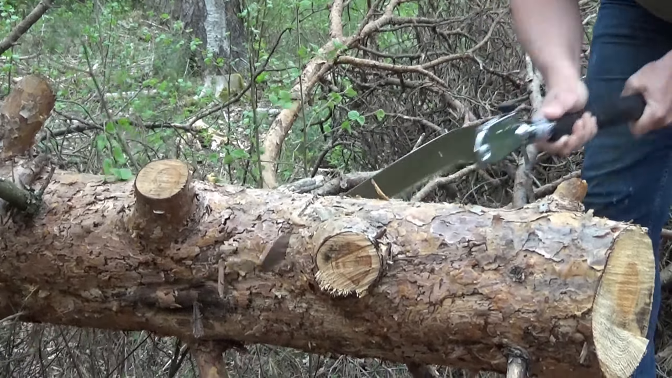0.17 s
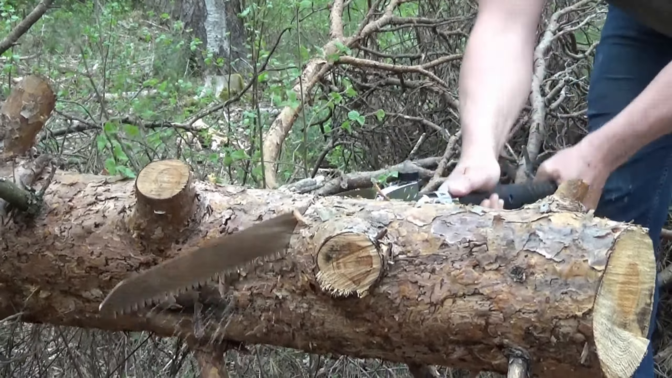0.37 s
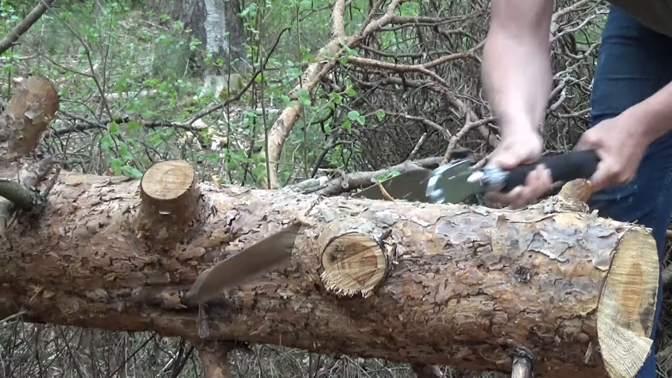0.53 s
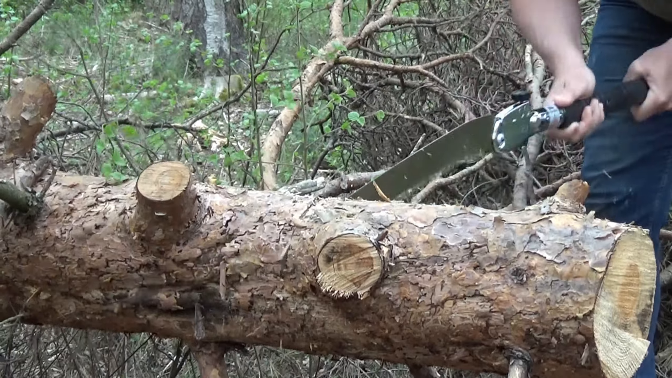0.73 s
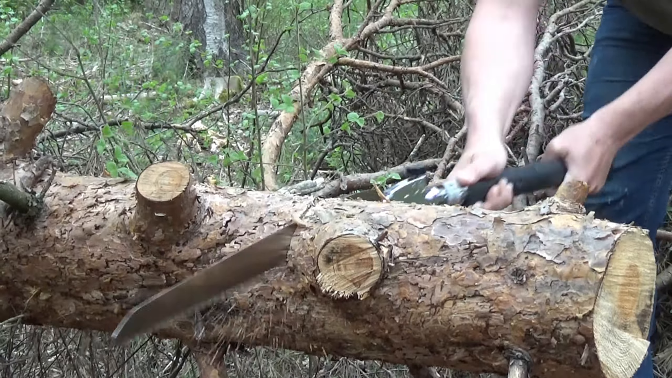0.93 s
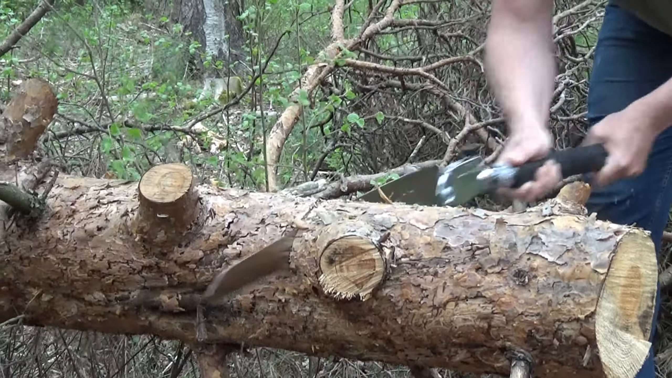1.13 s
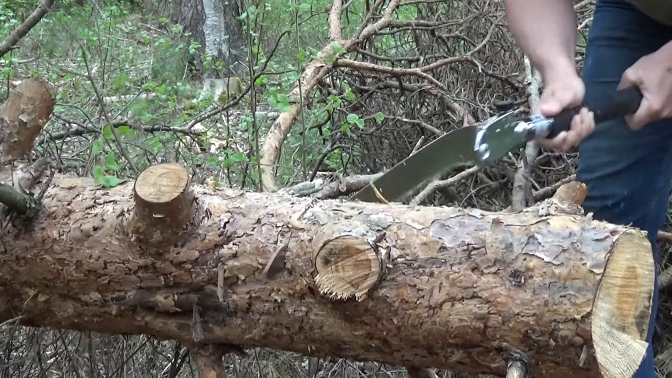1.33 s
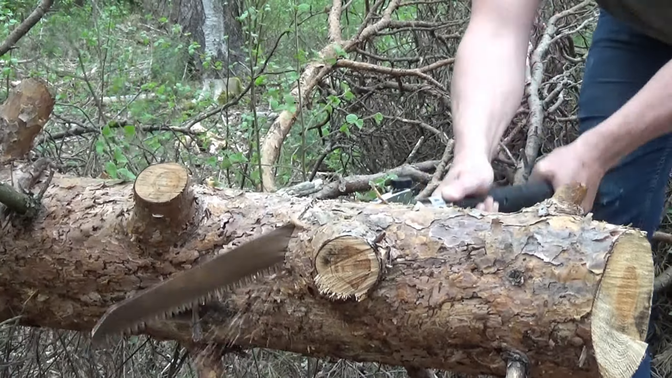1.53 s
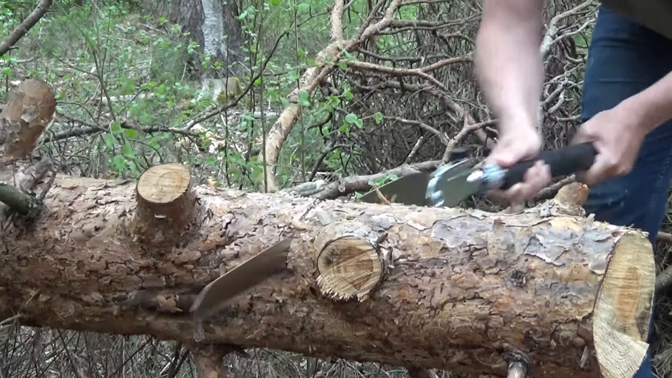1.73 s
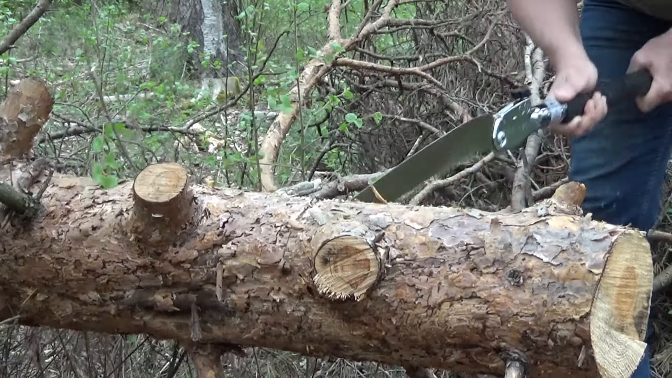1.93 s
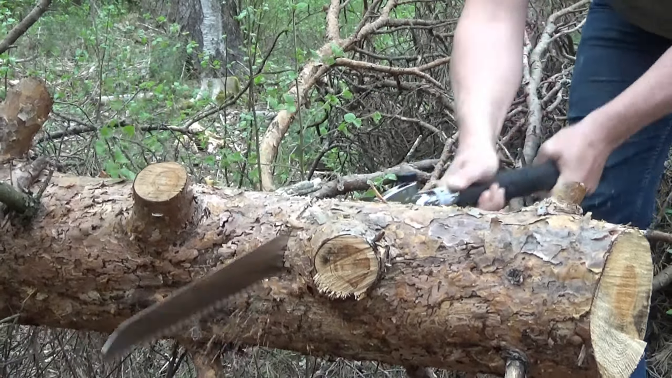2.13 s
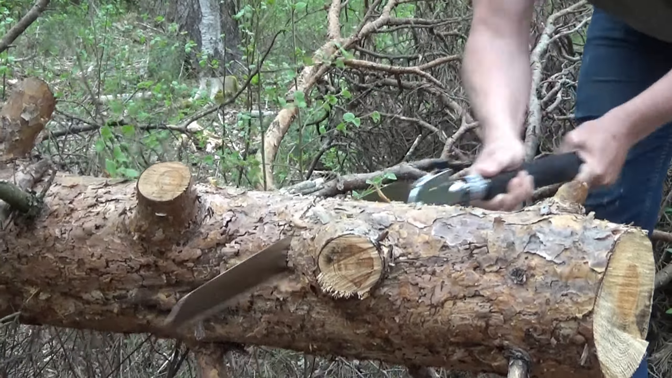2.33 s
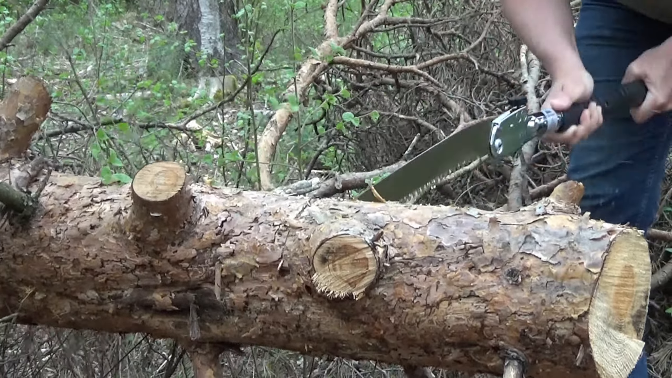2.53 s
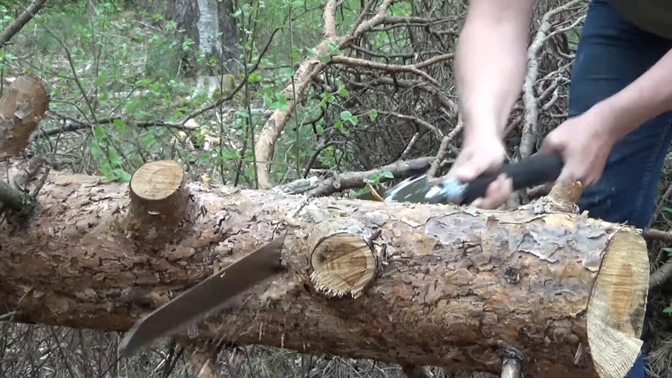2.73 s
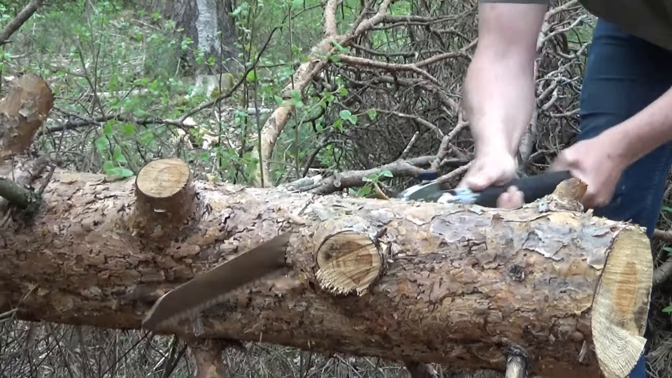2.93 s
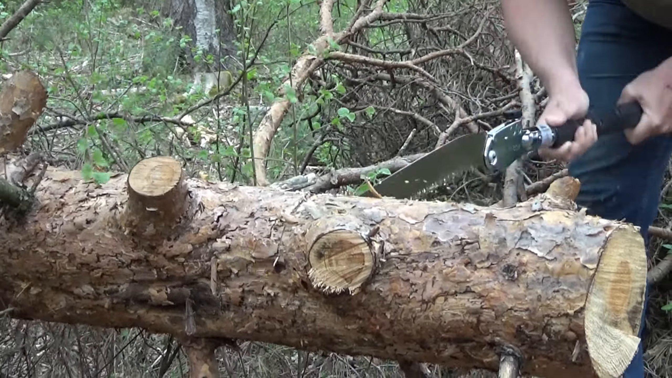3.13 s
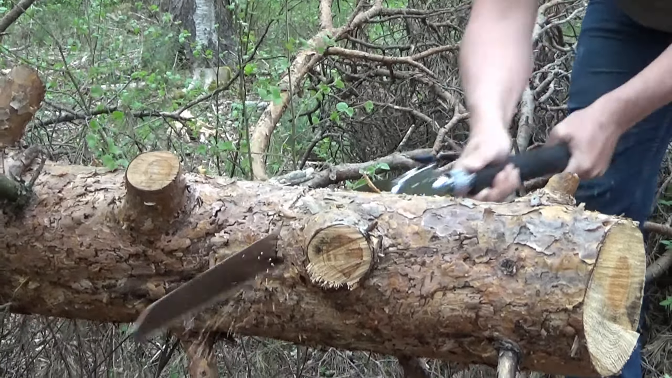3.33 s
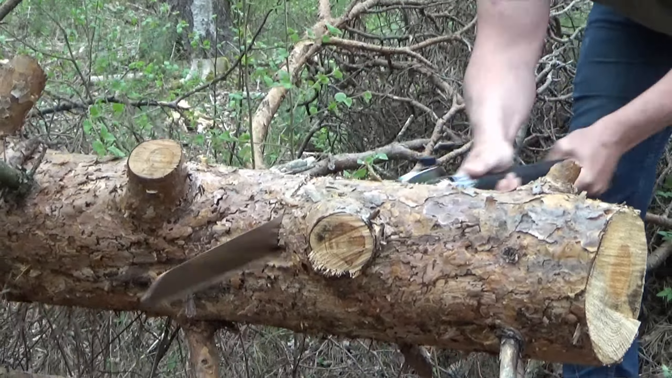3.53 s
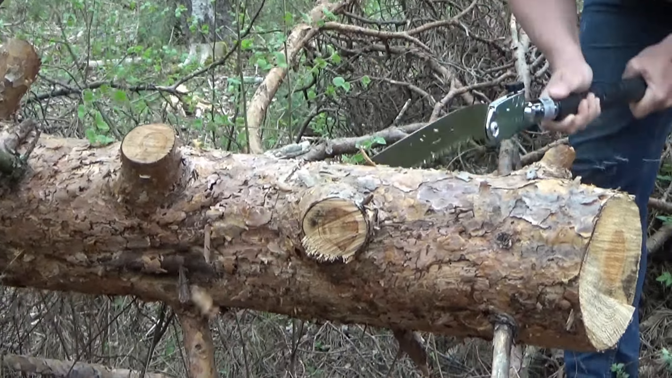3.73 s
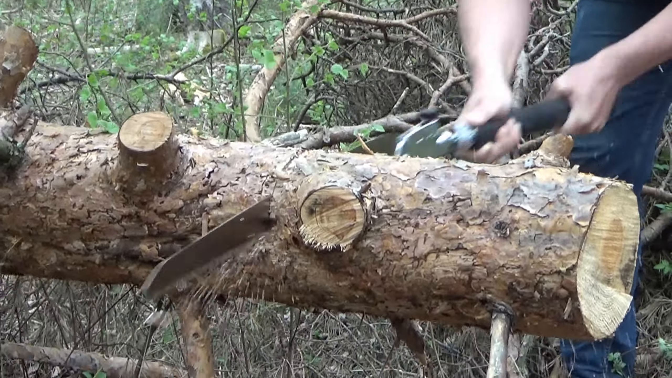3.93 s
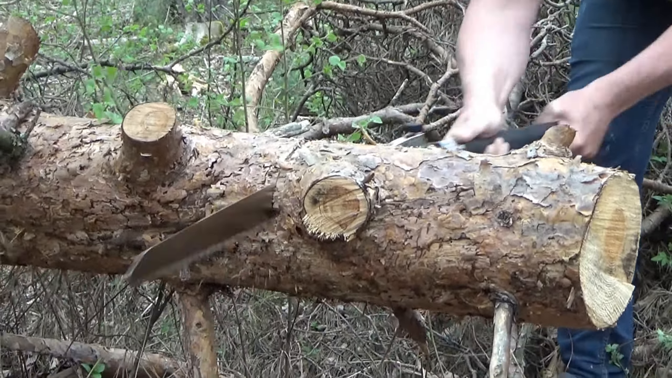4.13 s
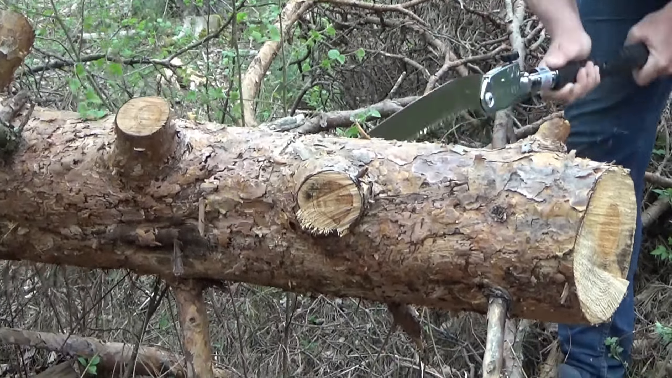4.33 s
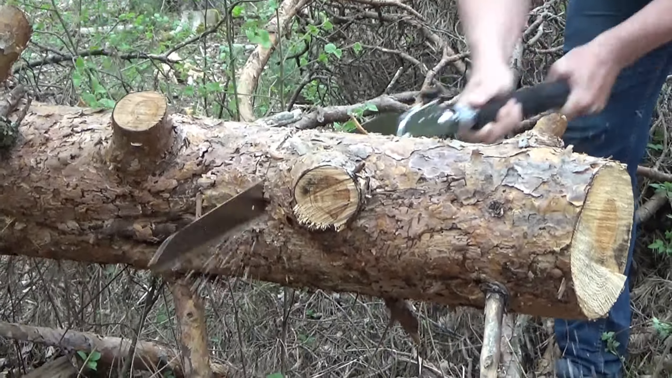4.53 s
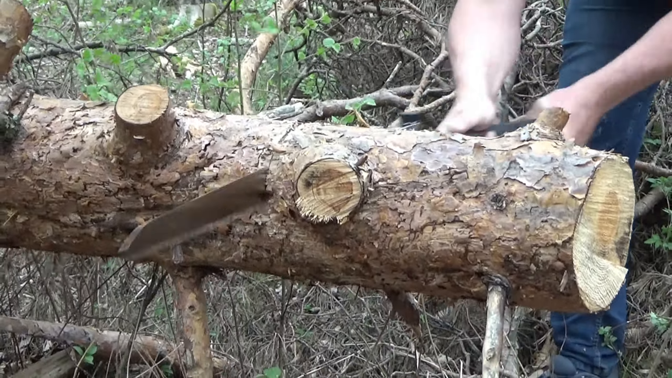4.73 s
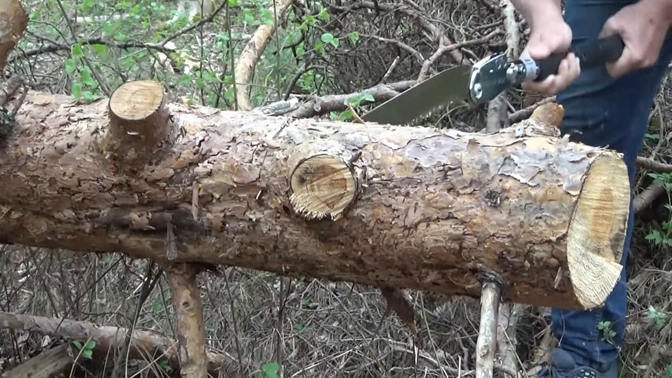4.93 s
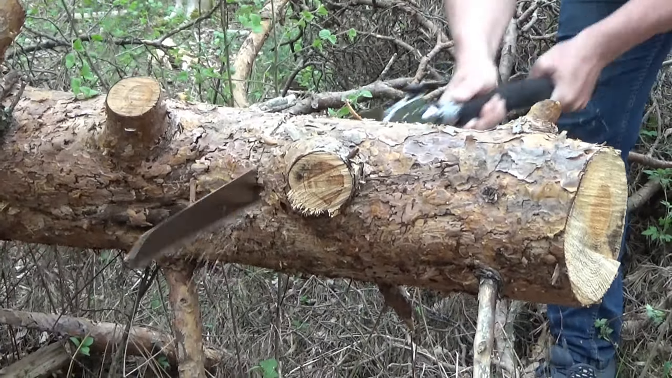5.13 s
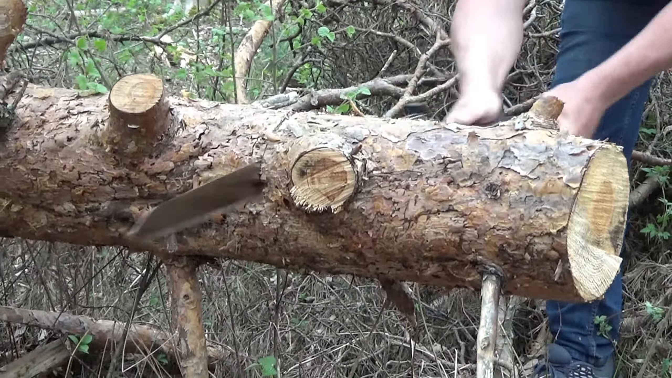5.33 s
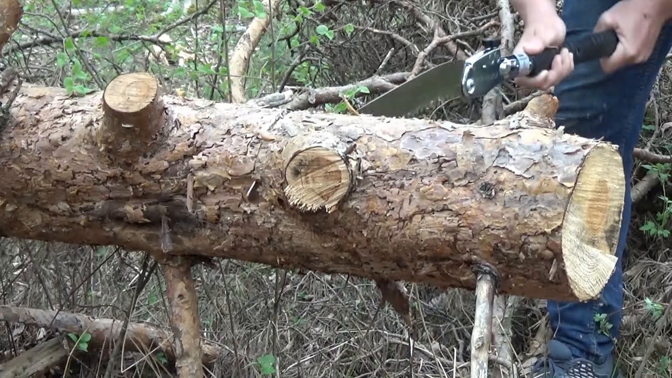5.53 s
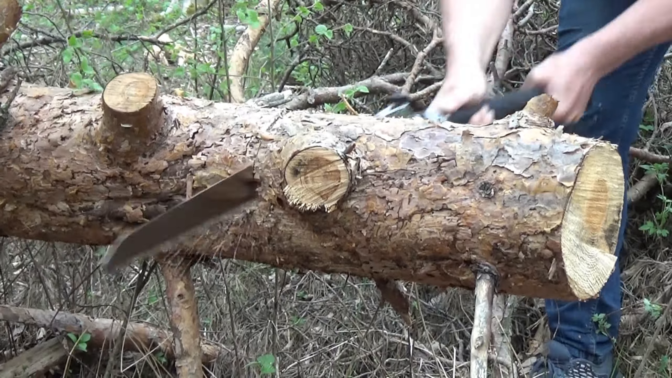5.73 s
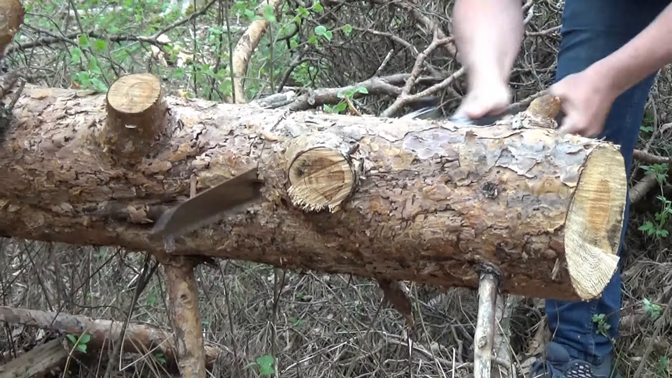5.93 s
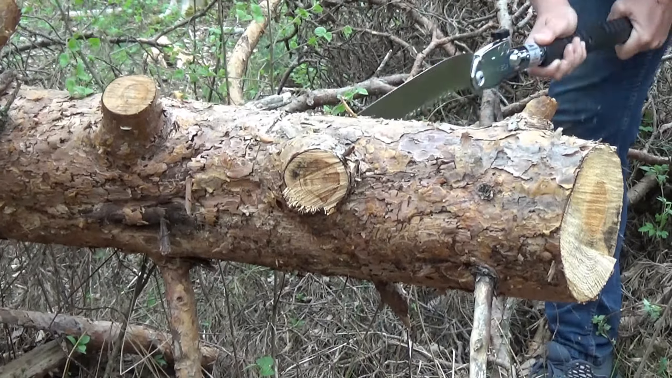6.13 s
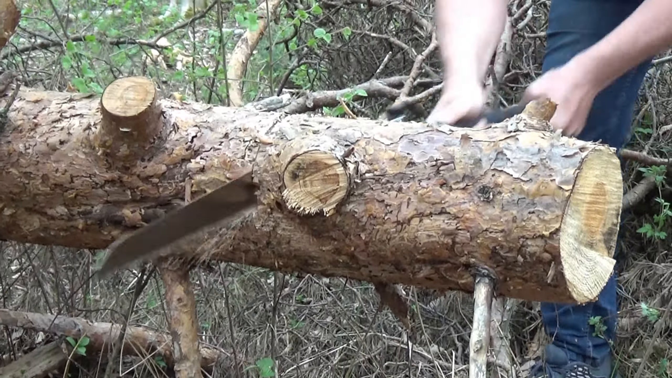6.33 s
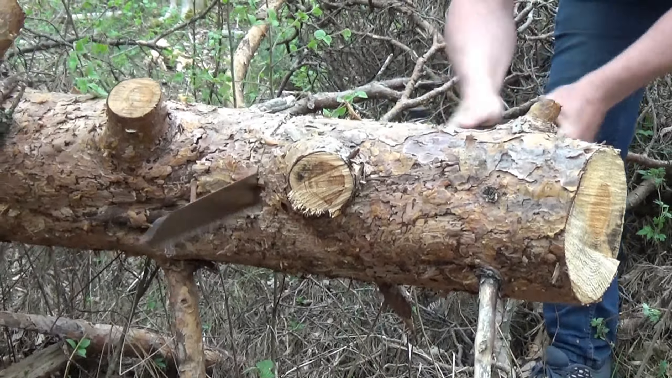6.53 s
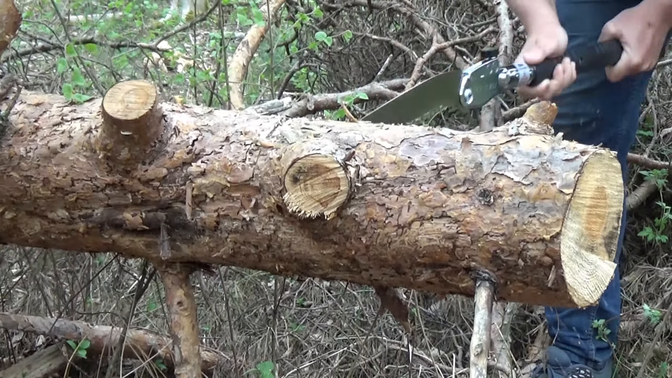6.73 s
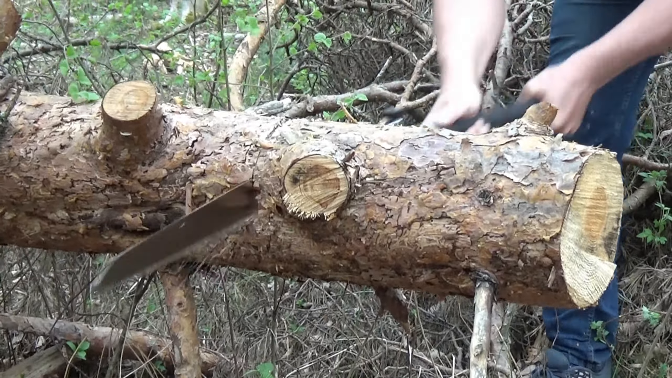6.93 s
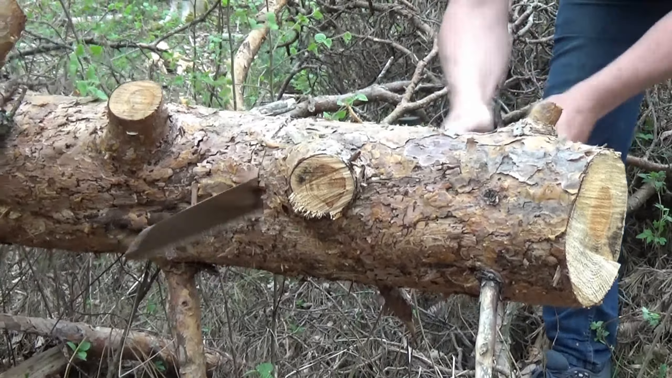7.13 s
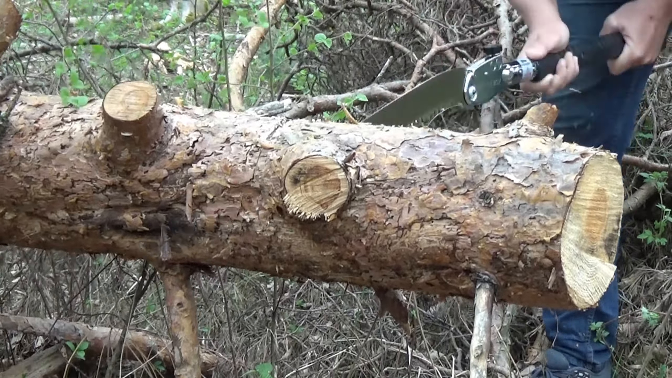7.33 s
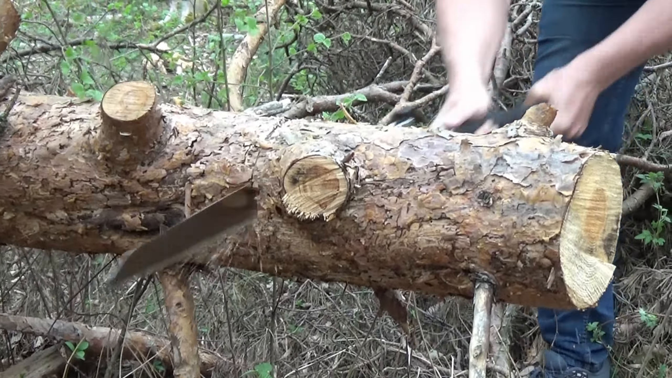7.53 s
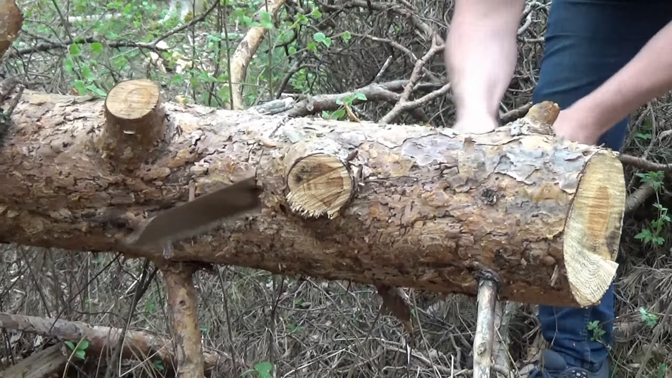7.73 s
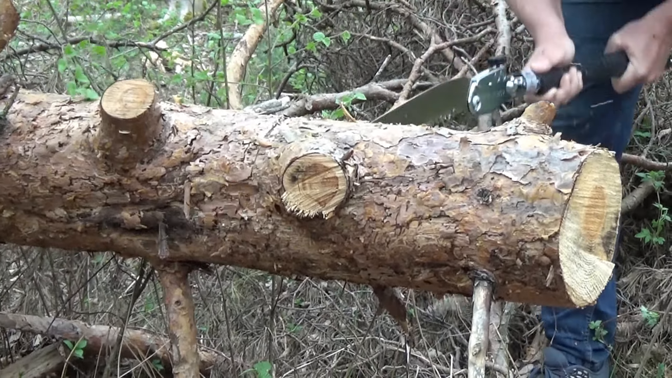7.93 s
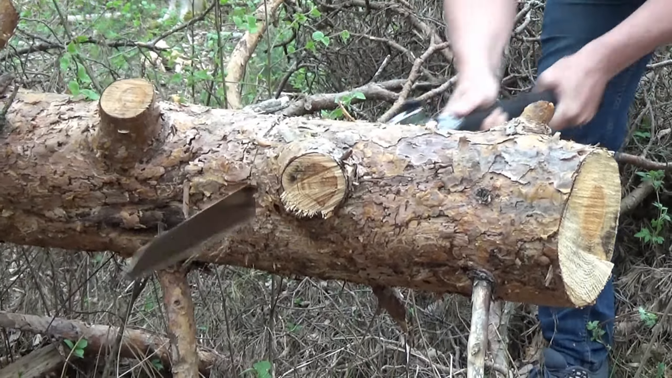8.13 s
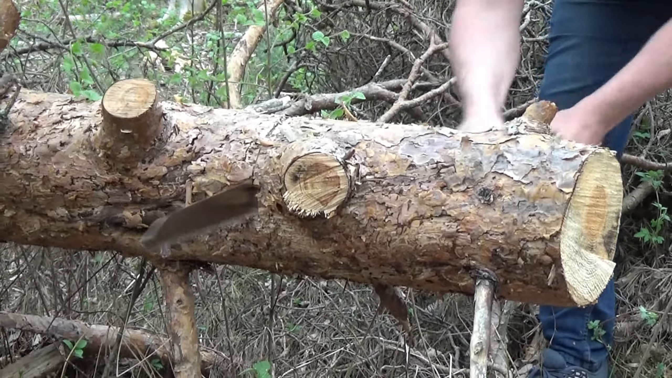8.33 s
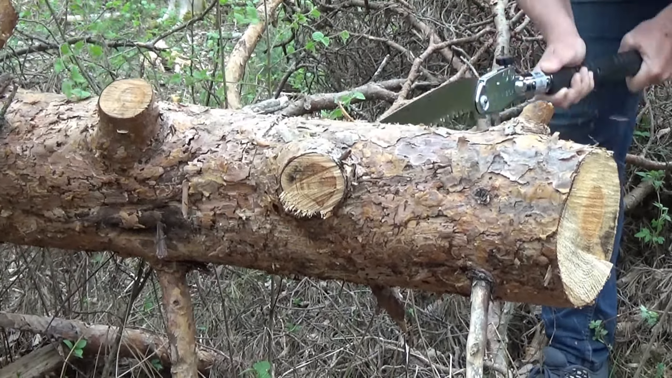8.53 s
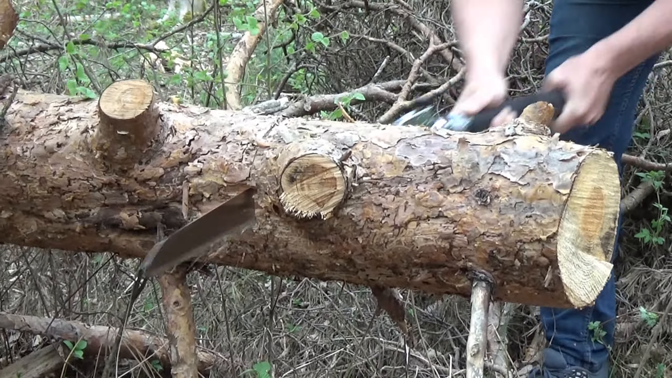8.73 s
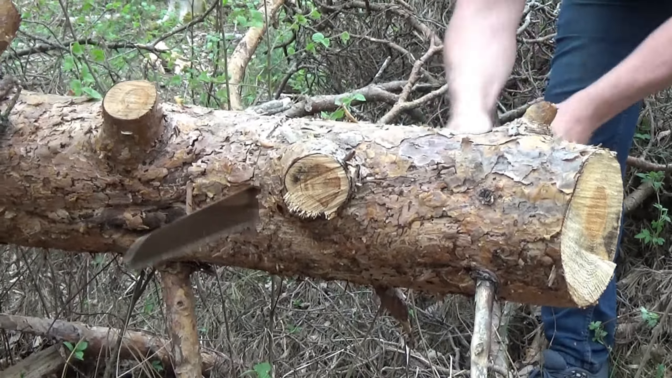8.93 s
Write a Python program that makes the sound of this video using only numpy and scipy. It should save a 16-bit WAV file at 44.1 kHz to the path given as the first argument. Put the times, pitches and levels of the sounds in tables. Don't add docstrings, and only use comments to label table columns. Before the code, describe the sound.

A handsaw rips through a pine log in quick, even pull and push strokes, dry and raspy, in a quiet wood.

```python
import sys
import numpy as np
from scipy import signal
from scipy.fft import rfft, irfft, next_fast_len
from scipy.io import wavfile
from scipy.ndimage import uniform_filter1d

SR = 44100
rng = np.random.default_rng(int(sys.argv[2]) if len(sys.argv) > 2 else 0)


def output_pcm(signal):
    pcm = np.clip(np.atleast_2d(signal).T, -1, 1) * 32767
    wavfile.write(sys.argv[1], SR, np.round(pcm).astype(np.int16))


def makeup_ratio(level_db):
    decades = np.asarray(level_db, float) / 20
    return 10 ** decades


N = 395136
T = np.arange(N) / SR
HZ = np.fft.rfftfreq(next_fast_len(N + 8192) // 2 * 2, 1 / SR)

# frequency in Hz, density in dB per Hz.
HUSH = [(18, -62), (30, -15.5), (988, -2.5), (1130, -7), (1280, -5), (1460, -9.5), (4530, -3.5),
        (5040, -10.5), (9970, -20), (16000, -21)]
# frequency in Hz, gain in dB.
TRUNK_ECHO = [(300, 7.5), (1000, 0.5), (3000, 5), (8000, 8.5), (13000, 0.5), (16000, 7)]
# frequency in Hz, side relative to mid in dB.
STEREO_WIDTH = [(60, -50), (150, -31), (400, -25), (1000, -22.5), (2500, -13.5), (6000, -18.5),
                (10000, -24), (15000, -42)]
# frequency in Hz, gain in dB.
CAMERA = [(10, 0), (15680, 0), (15800, -8), (15920, -42), (16500, -50), (22050, -60)]

# frequency in Hz, width in Hz, level in dB.
TEAR_MODES = [(5620, 2730, -9), (6050, 1300, -6), (6240, 190, -8.5), (8210, 1200, -3), (8050, 250, -10.5),
              (9600, 1240, -0.5), (8960, 120, -2.5), (10800, 1680, -3.5), (12700, 790, -6),
              (14300, 530, -11)]
# frequency in Hz, width in Hz, level in dB.
UPPER_MODES = [(2473, 267, 0.5), (2854, 330, -2.5), (3750, 110, 0), (3400, 580, -2.5), (4240, 780, -2)]
# frequency in Hz, width in Hz, level in dB.
LOWER_MODES = [(1336, 230, -5), (1650, 160, -8.5), (1807, 184, -0.5), (2057, 90, -4.5), (2046, 440, -6.5)]
# frequency in Hz, width in Hz, level in dB.
LOG_MODES = [(210, 102, -19.5), (289, 31, -12), (424.4, 30, -13), (506, 49, -15.5), (596, 86, -3.5),
             (757, 69, -0.5), (906, 126, -0.5), (1010.5, 24, 0.5), (1012, 114, -7.5)]
# frequency in Hz, width in Hz, level in dB.
STEEL_MODES = [(1688, 16, -2), (3440, 22, -1.5), (5880, 42, -2), (7980, 35, -2)]

# start in seconds, song level in dB.
SONGS = [(0.021, -38), (0.325, -41), (0.613, -37), (0.895, -50), (1.189, -46), (1.486, -43), (2.41, -40),
         (2.719, -46), (3.05, -37), (3.328, -41), (3.649, -36.5), (3.96, -45), (4.267, -39), (4.535, -45),
         (4.845, -33.5), (5.11, -40), (5.415, -38), (5.685, -41), (6.01, -37.5), (6.31, -42), (6.634, -34),
         (6.896, -38), (7.247, -27.5), (7.544, -44), (7.848, -39), (8.15, -40), (8.4, -38)]
# centre in seconds, pitch in Hz, glide in Hz per s,
# half length in seconds, level in dB.
SQUEAKS = [(2.425, 2030, 0, 0.0091, -28), (3.258, 3100, 0, 0.011, -26.5), (3.292, 3000, 0, 0.0072, -30),
           (2.66, 1005, 0, 0.034, -34), (4.254, 2050, 0, .01, -34), (6.889, 688, -3400, 0.021, -30),
           (6.9, 3300, 0, 0.013, -35), (8.238, 3800, 8000, 0.007, -35), (3.3, 3750, 0, .008, -44),
           (7.2, 1740, 0, 0.014, -24), (.345, 1500, 0, .025, -52), (1.235, 1500, 0, .025, -56),
           (2.14, 3490, 0, .025, -56), (4.83, 1780, 0, 0.019, -32), (5.4, 2000, 0, 0.028, -27.5),
           (6.1, 1010, 0, .025, -38), (2.62, 1010, 0, 0.035, -36), (8.745, 640, -2200, 0.027, -40),
           (.97, 1700, 0, .03, -61), (4.9, 4000, 0, .025, -60), (.738, 3600, 0, 0.0074, -24.5)]

# time in seconds, rate in Hz, level in dB, octave in dB.
PULL_HUMS = [(0.55, 150.3, -46, -44), (1.14, 152.8, -50, -45), (1.76, 149, -51, -44.5),
             (2.38, 150.7, -55.5, -50), (2.995, 148.3, -55, -55), (3.58, 157, -55, -54),
             (4.19, 164, -53, -75), (4.78, 137.2, -59.5, -55), (5.37, 149.3, -51, -46),
             (5.96, 156.6, -51, -51), (6.55, 149.3, -58.5, -56), (7.18, 147.6, -48, -46),
             (7.79, 135, -50.5, -48), (8.37, 149.5, -53, -58)]
# time in seconds, rate in Hz, level in dB, octave in dB.
PUSH_HUMS = [(.22, 141.5, -62, -70), (.83, 140, -68, -70), (2.001, 136, -63, -70), (2.63, 138.4, -61, -68),
             (3.3, 134.6, -67, -66), (3.87, 135.5, -67, -65), (4.49, 140.5, -66, -71),
             (5.68, 154.6, -72, -67), (6.24, 158.7, -66, -65), (6.84, 163, -67, -60),
             (7.469, 162, -71, -56.5), (8.07, 170, -73, -62), (8.67, 167, -73, -56), (8.95, 151, -58, -62)]
# time in seconds, pitch in Hz, level in dB.
WHINES = [(.55, 597, -50), (.55, 746, -42), (1.14, 763, -42), (1.46, 617, -49), (1.46, 771, -43),
          (1.76, 592, -45), (1.99, 781, -42), (3.03, 770, -46), (3.58, 783, -50), (4.19, 825, -46),
          (4.78, 685, -37), (5.37, 746, -41), (5.65, 740, -46), (5.96, 782, -44), (6.24, 726, -47),
          (6.55, 596, -45), (6.55, 745, -55), (6.835, 883, -39), (7.18, 590, -46), (7.18, 738, -45),
          (8.09, 694, -46), (8.37, 604, -50)]
# time in seconds, pitch in Hz, level in dB.
GROANS = [
    (8.355, 755, -31),
    (8.68, 832, -45),
]

# time in seconds, peak in dB, steel share in dB, log share in dB.
SNAGS = [(0.13, -3, -7, -40), (0.395, 2.5, -19, -35), (0.4244, 5, -19, -34), (0.7464, 4, -17.5, -49.5),
         (1.293, -4.5, -11, -30), (1.5669, 2, -13, -26), (1.5943, 7, -38, -53), (2.185, 7, -38, -43),
         (2.2536, 1, -17, -29), (2.8023, -5, -18, -28), (2.879, -4, -23, -33), (3.4415, -1, -19, -29),
         (3.458, 8, -34, -45), (3.776, 6.5, -17, -39), (4.0396, 0.5, -21, -32), (4.6778, 8, -37, -43),
         (5.235, 9, -30, -40), (5.2626, 8, -29, -33.5), (5.8142, 9, -31, -39), (5.839, 8, -22, -32),
         (6.4083, 8, -22, -42), (7.0177, 5.5, -26, -38), (7.0618, 1, -14, -34), (7.642, 7, -21, -34),
         (7.661, 6.5, -21, -43), (7.6834, 2, -27, -34), (8.2443, 4.5, -17, -22), (8.777, 4, -40, -41),
         (8.848, -4, -23, -23), (3.1597, -7, -4, -26), (3.2256, -5, -20, -40), (3.29, -7, -15, -46),
         (6.4517, -2, -22, -36), (1.6526, 0, -22, -29)]
# time in seconds, peak in dB.
TICKS = [(.0095, 1), (.0145, 3.5), (.0782, -24), (.156, -3), (0.161, 2), (1.0137, -8), (1.278, -15),
         (2.8645, -5), (2.762, -16), (2.838, -22), (2.859, -12), (3.395, -12), (3.472, -6), (3.481, -7),
         (3.995, -22), (4.003, -17), (4.0198, -18), (4.0816, -12), (4.605, -24), (5.7857, -16),
         (6.3954, -12), (7.542, -2), (8.8692, -9), (.96, -18), (.935, -21), (4.071, -8), (4.3335, -14),
         (4.6583, -26), (5.226, -5), (5.8047, -6), (0.227, 3), (6.33, -2), (6.365, -19), (6.449, -5),
         (6.692, -20), (7.3473, -10), (7.613, -11), (7.7208, 4), (7.922, -23), (8.2142, -20), (8.2222, -15),
         (8.49, -21)]
# start in seconds, length in seconds, gap in seconds,
# peak in dB, steel share in dB.
CHATTER = [
    (.1371, .025, .0112, 3, -14),
    (.7255, .015, .006, 5, -16),
    (1.3112, .015, .011, -3, -14),
    (3.178, .04, .0157, -12, -3),
    (3.2275, .07, .0157, -3, -2),
    (3.305, .03, .0157, -9, -3),
    (3.581, .035, .03, -1, -5),
    (6.1614, .018, .008, 2, -26),
]

# arms set off in seconds, teeth bite in seconds, blade stops in seconds,
# tearing level in dB, rub on the cut in dB.
PULLS = [(-0.397, -0.118, 0.068, -7, -3), (0.306, 0.38, 0.65, -14.5, 1), (0.935, 1.012, 1.215, -14.5, 0.5),
         (1.511, 1.635, 1.848, -14.5, 0.5), (2.104, 2.252, 2.473, -14.5, -1.5),
         (2.713, 2.8645, 3.072, -15.5, -1), (3.337, 3.4, 3.68, -16, -1), (3.99, 4.073, 4.28, -14.5, 0.5),
         (4.555, 4.673, 4.863, -15.0, 0.5), (5.14, 5.22, 5.46, -15.5, 2), (5.706, 5.793, 6.054, -15.5, 1),
         (6.329, 6.4465, 6.67, -15, -1), (6.918, 7.06, 7.273, -16, -1.5), (7.51, 7.612, 7.87, -16.5, -1.5),
         (8.067, 8.242, 8.485, -16.5, -0.5), (8.779, 8.826, 9.057, -15, 2)]
# arms set off in seconds, teeth bite in seconds, blade stops in seconds,
# tearing level in dB, rub on the cut in dB.
PUSHES = [(-0.051, 0.122, 0.36, -20, 2), (0.526, 0.72, 0.97, -22, -0.5), (1.187, 1.275, 1.532, -19.5, -1),
          (1.814, 1.851, 2.136, -19.5, 0.5), (2.437, 2.477, 2.758, -20.5, -0.5),
          (3.041, 3.087, 3.39, -21.5, 0), (3.653, 3.731, 4.006, -23.5, -0.5),
          (4.254, 4.308, 4.613, -22.5, -0.5), (4.833, 4.924, 5.211, -24.0, 1),
          (5.418, 5.508, 5.781, -23.0, 2), (6.04, 6.105, 6.366, -22.5, 0.5),
          (6.618, 6.683, 6.966, -23.5, 1.5), (7.242, 7.289, 7.59, -23.5, -1), (7.878, 7.945, 8.2, -23, 1.5),
          (8.463, 8.533, 8.825, -23.5, 1)]
# centre in seconds, half length in seconds, level in dB.
SLIPS = [(0.358, .015, -39), (0.39, 0.013, -30), (0.984, 0.023, -40.5), (1.545, 0.0089, -30.5),
         (1.569, .011, -20), (1.608, 0.019, -30), (2.155, .025, -38.5), (2.184, 0.0074, -25),
         (2.769, 0.024, -40), (2.803, 0.004, -19.5), (3.443, .004, -19.5), (3.713, .02, -46),
         (4.025, 0.013, -35), (4.042, 0.0075, -27), (4.618, .02, -46), (4.9, .02, -47),
         (6.395, 0.014, -32.5), (6.415, 0.011, -26), (6.992, 0.017, -36), (7.016, 0.0077, -18),
         (7.92, 0.016, -52), (8.228, .011, -30), (8.527, 0.017, -47), (8.846, 0.0059, -31)]
# centre in seconds, half length in seconds, change in dB.
SURGES = [(0.822, .04, 1), (1.438, 0.014, -0.5), (1.642, 0.012, -0.5), (1.72, .02, 0), (2.742, 0.017, 7),
          (2.952, 0.027, 0.5), (3.3, .015, -1.5), (3.55, .03, 1.5), (3.6, 0.025, -2), (3.83, 0.022, 0.5),
          (4.123, .015, 2.5), (4.188, 0.0073, -1), (4.47, 0.014, 1.5), (5.113, .015, -1),
          (5.304, 0.017, -0.5), (5.672, 0.025, -0.5), (5.924, 0.017, 1), (5.947, 0.011, -0.5),
          (6.248, 0.018, 2), (6.472, 0.027, 0.5), (7.088, 0.017, 2), (7.17, .012, 0), (7.199, 0.013, 2),
          (7.361, 0.014, 2), (7.725, 0.017, 1.5), (7.76, .025, -2), (7.79, 0.011, 1.5), (8.05, .012, -1.5),
          (8.3, 0.033, 1.5), (8.68, .025, 0.5)]
# centre in seconds, half length in seconds,
# upper blade change in dB, lower blade change in dB, log change in dB.
SCRAPES = [(0.83, 0.011, 5, 0, 2), (3.26, 0.021, 5, 0.5, 1), (5.9, .07, 0, -0.5, -2),
           (7.1, 0.071, 1, 0, -2.5), (5.4, 0.098, -3.5, -1.5, 2), (8.3, 0.037, 2.5, -1, -1.5),
           (8.93, .04, 0.5, 0, 1.5), (0.49, 0.066, -0.5, 1, 0), (3.6, .05, 5, -2.5, 0),
           (3, .03, -2.5, 0, 8)]

PULL_BEGIN_DB, PULL_END_DB = (-13.5, -18.5, -21), (-10.5, -13.5, -17.5)
PUSH_BEGIN_DB, PUSH_END_DB = (-9.5, -13, -16), (-11.5, -15, -19)
DEEPEN_DB_PER_S, RUB_WEIGHT = (0.274, 0.6134, 0.43), (1., 0.68, 0.48)
LATE_PEAK, RISE_POWER, FALL_POWER = 1.624, 1.88, 1.664
HELD_DB, BITE_S, TEAR_DB, RESTING_DB = -14.5, 0.003, 1.5, -55
LET_GO_S, LET_GO_SHARE = 0.029, 0.37


def level(x, db):
    return x * makeup_ratio(db) / np.sqrt(np.mean(x ** 2))


def shape_by(x, gain):
    return irfft(rfft(x, 2 * len(HZ) - 2) * gain)[:N]


def colour(x, points):
    hz, db = np.transpose(points)
    return shape_by(x, makeup_ratio(np.interp(np.log(HZ + 1), np.log(hz), db)))


def response(modes):
    total = 0
    for k, (hz, width, db) in enumerate(modes):
        band = 1 / (1 + 1j * (HZ ** 2 - hz ** 2) / (HZ * 1.835 * width + 1e-9))
        total = total + (-1) ** k * makeup_ratio(db) * band ** 2
    return total


def ring(x, modes):
    return shape_by(x, response(modes))


def walk(rate):
    hold = int(SR / rate)
    steps = np.repeat(rng.standard_normal(N // hold + 1), hold)
    return 1.276 * uniform_filter1d(uniform_filter1d(steps, hold), hold)[:N]


def bumps(rows):
    out = np.zeros(N)
    for s, span, size in rows:
        near = slice(max(int((s - 4 * span) * SR), 0), int((s + 4 * span) * SR))
        out[near] += size * np.exp(-((T[near] - s) / span) ** 2)
    return out


def hush():
    return level(colour(rng.standard_normal(N), HUSH), -52)


def tail(x, t60, db):
    u = np.arange(int(.4 * SR)) / SR
    echoes = rng.standard_normal(len(u)) * np.exp(-np.log(1000) * u / t60)
    return signal.fftconvolve(x, echoes * makeup_ratio(db) / np.sqrt(np.sum(echoes ** 2)))[:N]


def trees(saw):
    shifting = saw * walk(60)
    return tail(colour(shifting, TRUNK_ECHO), .2, -17)


def song():
    t60, size = .2, np.zeros(N)
    for s, db in SONGS:
        before, after = np.minimum(T - s, 0), np.maximum(T - s, 0)
        fade = np.log(1000) * after / t60 + (after / .08) ** 6
        size += makeup_ratio(db) * np.exp(-fade - (before / .02) ** 2)
    phase = 2 * np.pi * np.cumsum(1010 * (1 + 0.0013 * walk(25.45))) / SR
    overtone = makeup_ratio(-19) * np.sqrt(size / size.max()) * np.sin(2.04 * phase)
    return np.sqrt(2) * size * (np.sin(phase) + overtone)


def squeaks():
    out = np.zeros(N)
    for s, hz, glide, span, db in SQUEAKS:
        u = T - s
        tone = np.sin(2 * np.pi * (hz * u + glide * u ** 2 / 2))
        out += np.sqrt(2) * makeup_ratio(db) * np.exp(-(u / span) ** 2) * tone
    return out


def catches():
    rows = list(SNAGS)
    rows += [(s, db, -20, -36) for s, db in TICKS]
    for start, length, gap, db, steel_db in CHATTER:
        beats = np.arange(0, length, gap)
        late, loud = rng.standard_normal((len(beats), 2)).T
        times = start + beats + .04 * gap * late * (beats > 0)
        peaks = db + 1.5 * loud
        rows += [(s, peak, steel_db, -41.5) for s, peak in zip(times, peaks)]
    return rows


def snags():
    size, around = np.zeros((3, N)), np.arange(-300, 900)
    u = around / SR - .001
    decay = .78 * np.exp(-u / .0008) + .22 * np.exp(-u / .005)
    shape = np.where(u < 0, np.exp(u / .0005), decay)
    for s, db, steel_db, log_db in catches():
        at = np.clip(int(s * SR) + around, 0, N - 1)
        size[:, at] += makeup_ratio(db + np.array([[0], [steel_db], [log_db]])) * shape
    crack, steel, log = size * np.sign(rng.standard_normal(N))
    thump = [(170, 290, -7.5), (297, 59, 1.0)]  # Hz, width in Hz, dB
    out = ring(crack, TEAR_MODES) * makeup_ratio(-7.5)
    out += ring(steel, UPPER_MODES)
    out += ring(steel, LOWER_MODES) * makeup_ratio(-6)
    return out + ring(log, list(LOG_MODES) + thump) * makeup_ratio(15)


def teeth():
    out, wobble = np.zeros(N), walk(30)
    lines = [(s, hz, db, -.008, .042) for s, hz, db, _ in PULL_HUMS]
    lines += [(s, 2 * hz, db, 0, .035) for s, hz, _, db in PULL_HUMS]
    lines += [(s, hz, db, 0, .055) for s, hz, db, _ in PUSH_HUMS]
    lines += [(s, 2 * hz, db, 0, .055) for s, hz, _, db in PUSH_HUMS]
    lines += [(s, hz, db, 0, .04) for s, hz, db in GROANS]
    lines += [(s, hz, db, .009, .029) for s, hz, db in WHINES]
    for s, hz, db, lag, span in lines:
        near = np.abs(T - s) < .11
        u = T[near] - s
        speed = 1 - np.where(u < 0, 40, 70) * u ** 2 + .022 * wobble[near]
        tone = np.sin(2 * np.pi * hz * np.cumsum(speed) / SR)
        out[near] += makeup_ratio(db + 7.0) * tone * np.exp(-((u - lag) / span) ** 2)
    return out


def strokes():
    tear = np.full(N, makeup_ratio(RESTING_DB))
    shares = makeup_ratio(RESTING_DB) * np.outer(PUSH_END_DB, np.ones(N))
    for table, begin, end in ((PULLS, PULL_BEGIN_DB, PULL_END_DB), (PUSHES, PUSH_BEGIN_DB, PUSH_END_DB)):
        for start, bite, stop, db, rub_db in table:
            near = (T > start) & (T < stop)
            u = (T[near] - start) / (stop - start)
            bitten = (1 + np.tanh((T[near] - bite) / BITE_S / 2)) / 2
            eased = (1 + np.tanh((T[near] - stop + LET_GO_S) / .005)) / 2
            grip = (makeup_ratio(HELD_DB) + (1 - makeup_ratio(HELD_DB)) * bitten) * (1 - LET_GO_SHARE * eased)
            swing = u ** LATE_PEAK
            speed = np.abs(np.sin(np.pi * swing)) ** np.where(swing < .5, RISE_POWER, FALL_POWER)
            size = makeup_ratio(db + TEAR_DB) * grip * speed
            along = np.clip((u - .45) / 0.45, 0, 1)
            share = np.outer(begin, 1 - along) + np.outer(end, along)
            share += rub_db * np.array(RUB_WEIGHT)[:, None]
            tear[near] += size
            shares[:, near] += size * share
    shares = shares / tear
    slips = bumps((s, span, makeup_ratio(db)) for s, span, db in SLIPS)
    scrapes = np.array([bumps((s, span, dbs[k]) for s, span, *dbs in SCRAPES) for k in range(3)])
    return tear * makeup_ratio(bumps(SURGES)) + slips, shares + scrapes + np.outer(DEEPEN_DB_PER_S, T)


def fibres(rate, scatter_db, smear_s, hiss):
    loudness = makeup_ratio(scatter_db * np.minimum(rng.exponential(size=N), 3.5))
    snaps = (rng.random(N) < rate / SR) * loudness
    puffs = signal.lfilter([1], [1, -np.exp(-1 / (smear_s * SR))], snaps)
    return hiss + puffs / np.sqrt(np.mean(puffs ** 2))


def rasp(force, modes, rate, smear_s, patchy_db):
    spectrum = 0
    for mode in modes:
        grain = rng.standard_normal(N) * fibres(rate, 1.0, smear_s, 0.98)
        drive = force * grain * makeup_ratio(patchy_db * walk(30))
        spectrum = spectrum + rfft(drive, 2 * len(HZ) - 2) * response([mode])
    return irfft(spectrum)[:N]


def flex(x, depth_s):
    settle = np.clip(20 * (T[-1] - T), 0, 1)
    return np.interp(np.clip(T + depth_s * walk(9) * settle, 0, T[-1]), T, x)


def cutting(tear, upper_db, lower_db, log_db):
    force = tear * fibres(1100, 1.4, .0004, 2.3) / 3.1
    direct = rasp(force, TEAR_MODES, 900, 0.0031, patchy_db=1.14) * makeup_ratio(-0.5)
    top = signal.sosfiltfilt(signal.butter(4, 12800, "high", fs=SR, output="sos"), direct)
    direct = direct - top * np.clip((-18 - 20 * np.log10(tear)) / 22, 0, .45)
    upper = rasp(force * makeup_ratio(upper_db), UPPER_MODES, 400, 0.0035, patchy_db=2.0) * makeup_ratio(3.5)
    lower = rasp(force * makeup_ratio(lower_db), LOWER_MODES, 300, 0.0061, patchy_db=2.5) * makeup_ratio(9.5)
    log = rasp(force * makeup_ratio(log_db), LOG_MODES, 200, 0.0016, patchy_db=2.0) * makeup_ratio(13)
    steel = ring(force * rng.standard_normal(N), STEEL_MODES) * makeup_ratio(1)
    return direct + flex(upper, .002) + flex(lower, .002) + flex(log, .0015) + steel


def scene():
    tear, shares = strokes()
    saw = cutting(tear, *shares) + song() + teeth() + squeaks() + snags()
    mid = saw + trees(saw) + hush()
    side = colour(tail(mid, 0.22, -0.75), STEREO_WIDTH)
    return np.array([mid + side, mid - side])


def low_pass(x):
    return signal.sosfilt(signal.butter(12, 16480, fs=SR, output="sos"), x)


def record(dry):
    x = signal.sosfilt(signal.butter(2, 80, "high", fs=SR, output="sos"), dry)
    rounded = np.tanh(0.89 * x) / .9
    mix = np.array([colour(channel, CAMERA) for channel in rounded])
    return low_pass(mix)


dry = scene()
out = record(dry)
output_pcm(out)
```